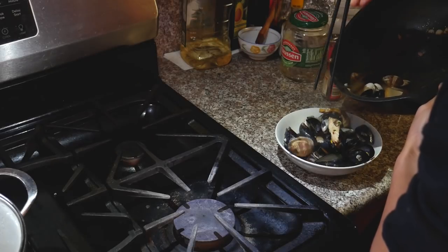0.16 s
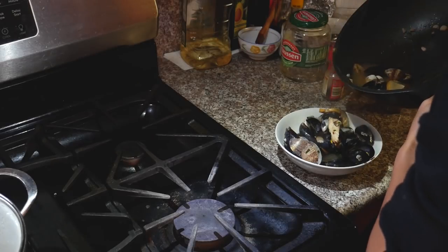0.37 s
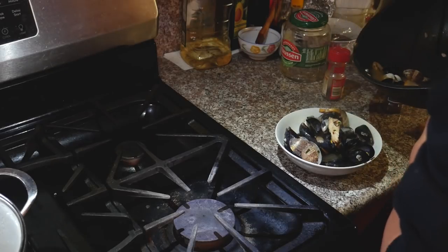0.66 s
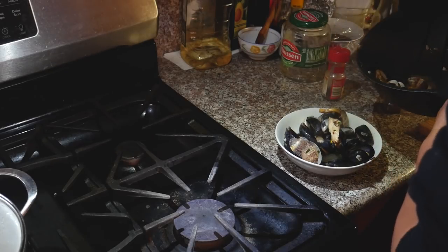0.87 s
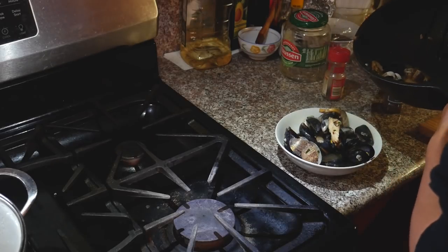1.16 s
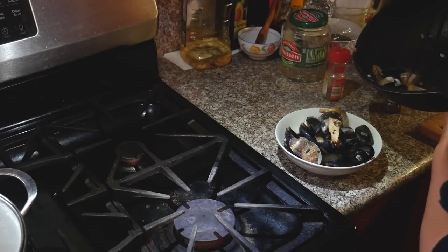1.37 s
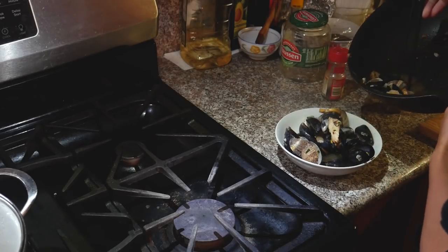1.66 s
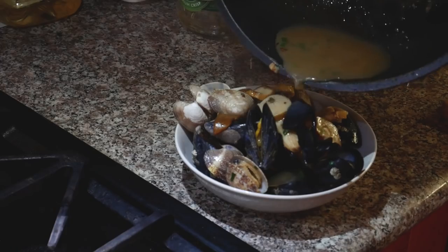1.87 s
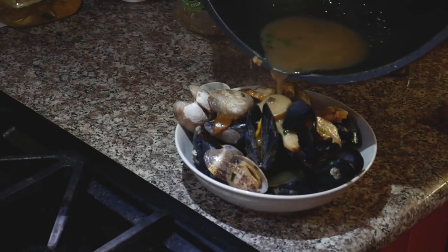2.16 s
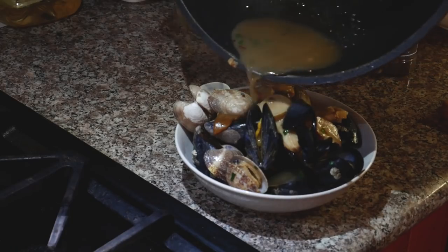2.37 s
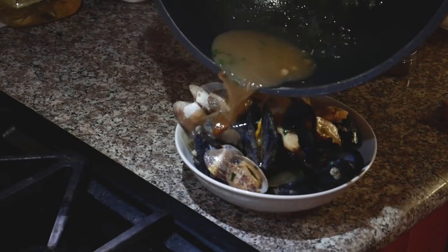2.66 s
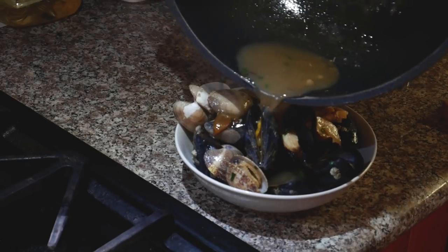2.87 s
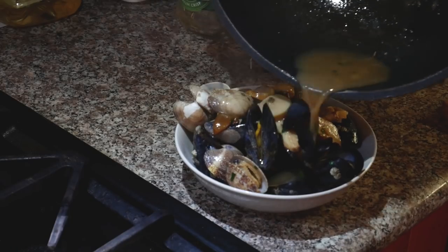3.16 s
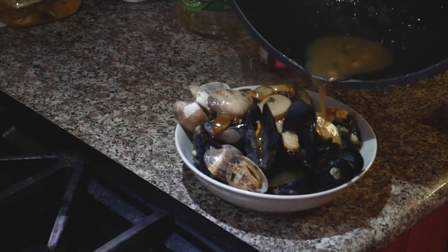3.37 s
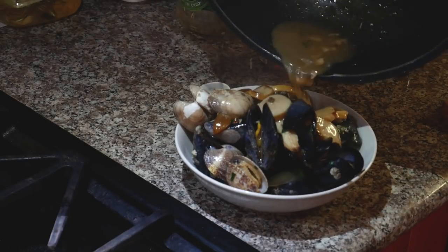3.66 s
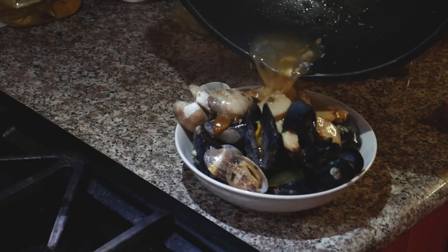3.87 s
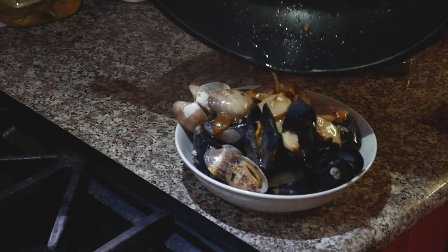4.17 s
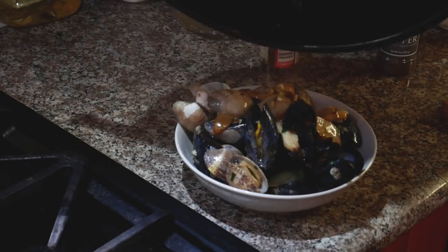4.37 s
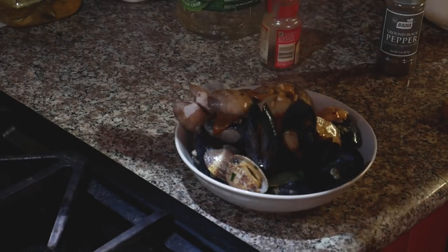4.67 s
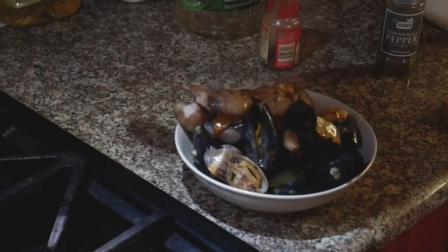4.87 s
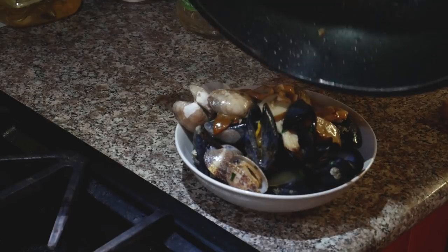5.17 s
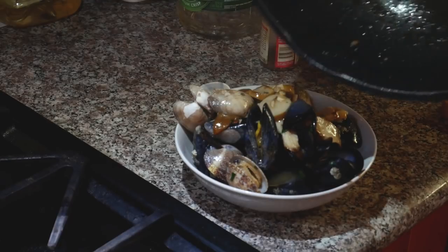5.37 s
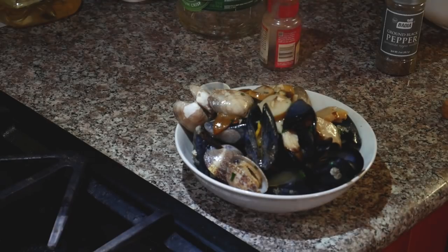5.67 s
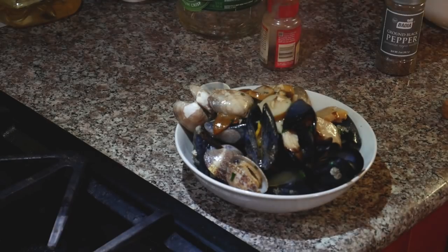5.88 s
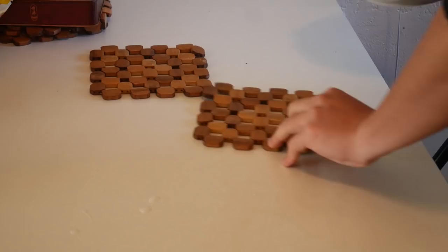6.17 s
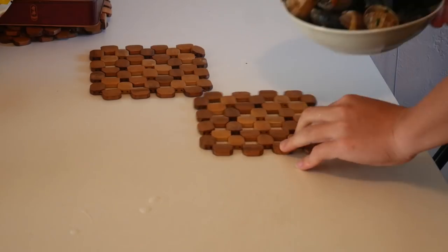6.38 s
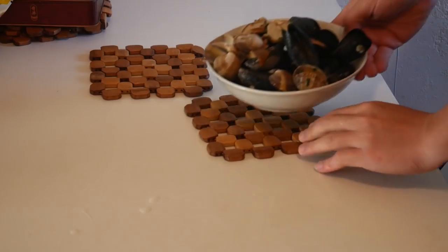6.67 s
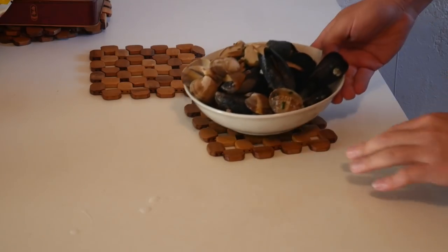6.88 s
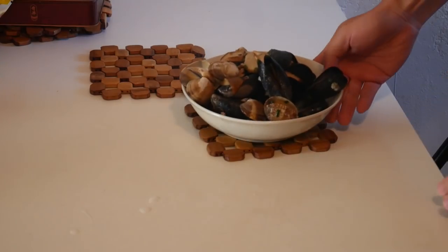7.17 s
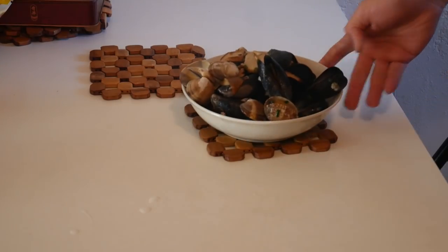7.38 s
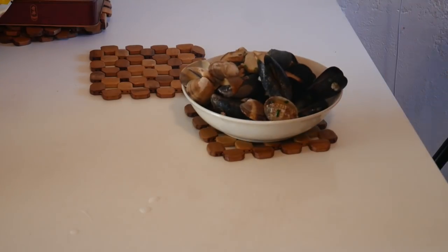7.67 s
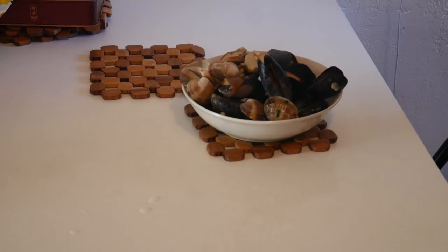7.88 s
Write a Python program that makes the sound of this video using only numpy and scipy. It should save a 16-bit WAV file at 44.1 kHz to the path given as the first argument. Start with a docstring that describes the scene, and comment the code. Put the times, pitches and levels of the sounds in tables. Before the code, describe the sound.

A quick clatter of shells is followed by bright knocks of chopsticks on a steel wok, then their clack and short roll on stone. A thin stream of broth trickles with tiny plips. Next a wooden trivet clacks and scrapes on a table, a heavy bowl lands on it with a thud, and a sleeve swishes faintly. It is all heard from nearby, over the low hum of a kitchen and then a dining room.

```python
"""A humming kitchen, then a dining room. The last clams click from a wok into a bowl. Chopsticks knock
the ringing steel rim, then bounce and roll on the stone counter. Broth trickles over the shells, its
drops trapping tiny ringing bubbles. In the dining room a wooden trivet (a pot stand) slaps down and
slides on the table. The full bowl thumps onto it and rocks once; clothes swish as the arm draws back."""
import sys
import numpy as np
from scipy import signal
from scipy.fft import rfft, irfft, next_fast_len
from scipy.io import wavfile
from scipy.ndimage import map_coordinates

SR = 44100
rng = np.random.default_rng(int(sys.argv[2]) if len(sys.argv) > 2 else 0)


def put_to_file(sound):
    """Save the sound as 16-bit audio at rate SR, in the file named by the first command-line argument."""
    columns = np.atleast_2d(sound).T  # one column per channel
    safe = np.clip(columns, -1, 1)
    whole_steps = np.round(safe * 32767)
    wavfile.write(sys.argv[1], SR, whole_steps.astype(np.int16))


N = 354563

# Levels are relative: each source adds its own gain. A decay_s is the time to fade by 60 dB.
# A "tone" lists how strong low and high sounds are; "modes" are the notes a struck thing rings at.
# Electric hum in each room: mains_multiple, level_db
KITCHEN_MAINS = [(1, -57), (2, -42), (4, -64.5)]
DINING_MAINS = [(2, -51.5), (4, -53.5)]
# The kitchen fan, and distant motors heard in the dining room: pitch_hz, level_db
FAN_HUM = [(153, -60.5), (186.5, -57.5), (202.5, -63.5), (219.5, -61), (235, -60), (322, -62.5), (356, -67),
           (415, -66), (511, -65.5)]
FAR_MOTOR_HUM = [(47, -53), (153.5, -58), (168, -62), (187, -54.5), (205, -64), (237, -62), (356, -59),
                 (441, -60.5), (513, -67), (630, -67)]
# Moving air in each room: pitch_hz, level_db
KITCHEN_AIR_TONE = [(12, -48), (30, -12.5), (60, -3.5), (90, -9.5), (160, -7.5), (235, -9.5), (270, -11),
                    (400, -9), (520, -11), (800, -16.5), (1100, -19), (1500, -25), (4500, -34.5),
                    (9000, -44.5), (16000, -45.5)]
DINING_AIR_TONE = [(20, -6), (45, 4.5), (90, -5), (170, 0), (300, -5), (500, -9.5), (800, -13.5),
                   (1500, -22), (3000, -24.5), (7000, -34.5), (16000, -46.5)]
# How long the echo lasts in both rooms: pitch_hz, decay_s
ROOM_DECAY = [(150, 0.44), (500, 0.39), (1400, 0.52), (4000, 0.41), (9000, 0.29), (16000, 0.25)]

# Rubbing fabric: pitch_hz, level_db
CLOTH_TONE = [(700, 3), (1800, -3), (3500, 0.5), (5500, -3.5), (7500, -11), (12000, -14), (16000, -26)]
# Faint back-and-forth swishing: start_s, period_s, stop_s, level_db
SWISH_RUNS = [(1.968, .358, 4.6, -60), (4.775, 0.2285, 5.55, -58)]
# Single moves of the arm: middle_s, level_db, half_length_s
ARM_MOVES = [(5.86, -58, 0.097), (6.09, -55.5, 0.041), (6.189, -49, 0.05), (7.59, -47.5, 0.1005),
             (7.895, -51, 0.051)]
# Light ticks of rolling chopsticks, and taps of hands, dishes and settling shells:
# start_s, level_db, brightness_db_per_octave
TAPS = [(1.506, -32.5, 6), (1.611, -28, -1.5), (1.764, -39.5, -2.5), (1.786, -27, 2), (1.826, -40.5, 0),
        (5.848, -34.5, -1.5), (7.128, -22, -3), (7.172, -23.5, -2.5)]
# One such tick or tap: pitch_hz, level_db
TAP_TONE = [(400, -26), (850, -2), (1400, -11), (3000, -3.5), (4500, -13), (5800, -8.5), (7000, -21.5),
            (12800, -34.5), (16000, -44)]

# The fattest drops of broth: start_s, level_db, bubble_hz, splash_db
BIG_DROPS = [(2.8138, -26.5, 2800, -18), (2.885, -38.5, 3050, -4), (2.8983, -35, 2430, -2),
             (2.9264, -34, 3450, -22), (2.9746, -41, 2240, -2.5), (3.03, -32.5, 2790, -4),
             (3.1557, -34.5, 4970, -22), (3.693, -35.5, 4000, 1), (3.7298, -24, 2410, -13.5),
             (3.8951, -35, 4900, 1), (4.1116, -40, 2080, 0), (4.1906, -37, 1950, 2),
             (4.2667, -40.5, 2300, -17)]
# Extra flow at each further tip of the wok: middle_s, level_db, half_length_s
GUSHES = [(2.92, -62, .12), (3.36, -62.5, .06), (3.69, -65, .05), (4.06, -58.5, .15)]
# Shells dropping on shells: start_s, level_db, ring_hz, brightness_db_per_octave
SHELL_HITS = [(-0.025, -12.5, 2780, 7), (0.0258, -9, 3720, 0.5), (0.062, -4.5, 2916, 3),
              (0.0651, -7.5, 2650, 1), (0.0773, -18.5, 3330, -3.5), (0.1452, -8.5, 3780, 5),
              (0.1655, -18, 1900, -4.5)]
# A shell's click: pitch_hz, level_db
SHELL_TONE = [(240, -60), (400, -29.5), (616, -35), (655, -38), (777, -20.5), (2050, -9), (2840, 2.5),
              (4240, -5.5), (4800, 0.5), (7870, -23), (12500, -27.5), (16000, -44.5)]

# Chopsticks knocking the wok: start_s, level_db, treble_limit_hz, ring_db
WOK_HITS = [(0.244, -2.5, 14600, -9.5), (0.2752, -9.5, 6000, -12), (0.3275, -11.5, 12600, -10),
            (0.335, -15.5, 14000, -22), (0.403, -19, 5000, -13)]
# The clack on its rim: pitch_hz, level_db
WOK_TONE = [(120, -37), (350, -12), (520, -16), (900, -5.5), (1400, -7.5), (1800, 0), (2400, -7),
            (3500, -1.5), (4100, 2), (4500, -11), (5400, -0.5), (6400, -15.5), (9500, -11), (10400, -27),
            (13000, -13), (16000, -29)]
# Its ringing steel: pitch_hz, level_db, decay_s
WOK_MODES = [(856, -14, .17), (1820, -5, .14), (1997, -6, .33), (2939, -4, .24), (3500, 0, .2),
             (4081, -1, .32), (5464, -4, .26), (7115, -5, .38), (8895, -3, .33), (10905, -12, .22),
             (13080, -7, .11)]

# Each chopstick meeting the counter: start_s, level_db, first_bounce_change_db
STICK_LANDINGS = [(1.2455, -7, -7.5), (1.3216, -9, -20.5)]
# A stick's clack on stone: pitch_hz, level_db
STICK_TONE = [(150, -61), (300, -21), (490, -8.5), (700, -31), (1080, -6.5), (1550, -16), (2020, 2.5),
              (2400, -15), (2850, -2.5), (3400, -7), (3900, -15), (5630, -14.5), (12300, -37.5),
              (16000, -58)]
# The sticks bending to and fro: pitch_hz, level_db, decay_s
STICK_MODES = [(454, -9, 0.14), (547, -11, 0.48), (1106, 0, 0.41), (1292, -5.5, 0.23), (1990, -0.5, 0.3),
               (2143, -6, 0.35), (2810, -8.5, 0.38), (2880, -12, 0.19), (3330, 4.5, 0.17), (5610, -5, 0.15)]
# The notes of the rolling sticks: pitch_hz, width_hz, level_db
ROLL_MODES = [(1077, 32, 12), (1290, 22, -7), (1990, 39, 0.5), (2910, 150, 5), (3250, 56, -3.5),
              (3650, 120, 1.5), (4970, 56, -5)]
# The hiss of their rolling: pitch_hz, level_db
ROLL_TONE = [(240, -32), (400, -3), (545, -5.5), (676, -11.5), (1070, -12.5), (1180, -11.5), (2320, -16.5),
             (2800, -5.5), (10500, -33), (16000, -44.5)]

# The trivet's edges slapping the table: start_s, level_db, brightness_db_per_octave, echo_db
TRIVET_HITS = [(6.226, -2, 0.5, -2.5), (6.2663, -4.5, 4, -4.5), (6.375, -12.5, -5, -3),
               (6.677, -21, -2, -2.5)]
# Its slap and its scrape: pitch_hz, level_db
SLAP_TONE = [(180, -48), (300, -23.5), (900, -13.5), (978, -2.5), (1480, -11.5), (1690, -2.5), (2250, -6.5),
             (3290, 0), (4990, -10), (5430, -9), (8360, -25), (9880, -25), (13800, -35.5), (16000, -58)]
SCRAPE_TONE = [(240, -43), (400, -14), (636, -7), (697, -15), (994, -4), (1490, -8), (1650, -7.5),
               (2840, -6.5), (12300, -38), (16000, -46)]
# Its ringing wooden blocks: pitch_hz, level_db, decay_s
BLOCK_MODES = [(980, -2, .12), (1280, -5, .15), (1690, -4, .12), (1973, 2, .15), (2780, -1, .12),
               (3165, 0, .12), (3490, -2, .12), (4360, -7, .1), (5362, -6, .1)]
# Pushes that slide it: start_s, stop_s, level_db
SLIDES = [(6.307, 6.492, -38.5), (6.681, 6.679, -40)]

# The bowl meeting the trivet: start_s, level_db, brightness_db_per_octave, ring_db
BOWL_HITS = [(6.976, 1, 1, -4.5), (6.980, -8.5, 1.5, -2), (6.987, -10.5, -0.5, -20), (7.187, -10, -0.5, -8),
             (7.191, -15, 2.5, -12)]
# Its thud: pitch_hz, level_db
THUD_TONE = [(41, -55), (70, -28), (86, -19), (129, -5.5), (199, -8.5), (233, -6), (441, 0), (472, -3),
             (529, -4.5), (1100, -12), (1310, -14.5), (3910, -27), (9700, -43), (14000, -53), (16000, -89)]
# The table top with the bowl on it: pitch_hz, level_db, decay_s
TABLE_MODES = [(145, -10, 0.44), (199, -2.5, 0.33), (319, -6, 0.25), (431, -0.5, 0.114), (472, -2, 0.15),
               (507, 0.5, 0.17), (790, -14, 0.6), (884, -8, 0.43), (1016, -12.5, 0.41), (1279, 0, 0.12),
               (1340, -9, 0.19), (1720, -19, 0.25)]
# The bowl's foot rocking down: start_s, level_db
FOOT_TOUCHES = [(7.138, -25.5), (7.197, -20)]
# The low notes that the rocking wakes: pitch_hz, level_db, decay_s
ROCK_MODES = [(148, -6.5, 0.16), (199, -12.5, 0.23), (249.4, 0, 0.23), (290.6, -5.5, 0.2),
              (389, -6.5, 0.21), (546, -5.5, 0.064)]

MAINS_HZ, TOP_HZ = 60.03, 15900  # the electric supply; the upper limit of the sound
TIME_S = np.arange(N) / SR
HIT_S = np.arange(2 ** 15) / SR  # time since a hit
HIT_HZ = np.fft.rfftfreq(len(HIT_S), 1 / SR)  # the frequencies in a hit


def amp(db):
    """Turn decibels into a gain to multiply by."""
    return 10 ** (np.asarray(db) / 20)


def unit_level(x):
    """Scale a long sound to an average (rms) level of 1."""
    return x / np.sqrt(np.mean(x ** 2) + 1e-20)


def unit_energy(x):
    """Scale a short sound to a total energy of 1."""
    return x / (np.linalg.norm(x) + 1e-12)


def look_up(points, hz):
    """Read between (pitch_hz, value) rows, with octaves evenly spaced."""
    pitches, values = np.transpose(points)
    return np.interp(np.log(hz + 1), np.log(pitches + 1), values)


def wobble(per_s):
    """A smooth random curve through per_s points a second."""
    points = rng.standard_normal(int(N * per_s / SR) + 4)
    return map_coordinates(points, [TIME_S * per_s])


def filtered(x, gain_at):
    """Scale each frequency in x by gain_at(hz)."""
    size = next_fast_len(N + SR // 2)
    return irfft(rfft(x, size) * gain_at(np.fft.rfftfreq(size, 1 / SR)), size)[:N]


def with_tone(x, tone):
    """Give x a tone, at an average level of 1."""
    return unit_level(filtered(x, lambda hz: amp(look_up(tone, hz))))


def noise(tone):
    """A steady rush with the given tone."""
    return with_tone(rng.standard_normal(N), tone)


def fade(decay_s, t=HIT_S):
    """A gain that falls 60 dB in decay_s; 1 - fade is a soft start."""
    return np.exp(-np.log(1000) * t / decay_s)


def held(start_s, stop_s, rise_db_per_s, fall_db_per_s):
    """A gain that rises to 1 by the start, holds, and dies away after the stop."""
    early_s, late_s = np.maximum(start_s - TIME_S, 0), np.maximum(TIME_S - stop_s, 0)
    return amp(-rise_db_per_s * early_s - fall_db_per_s * late_s)


def swells(rows):
    """A gain with one bell-shaped swell for each row."""
    return sum(amp(db) * np.exp(-((TIME_S - s) / half_s) ** 2) for s, db, half_s in rows)


def add(track, start_s, sound):
    """Mix a sound into the track, dropping what falls outside it."""
    start = round(start_s * SR)
    rest = sound[max(-start, 0):]
    part = track[max(start, 0):][:len(rest)]
    part += rest[:len(part)]


def clack(tone, bright, chatter_s, rise_s, limit_hz=30000):
    """Two things chatter briefly as they meet; a harder hit is brighter and reaches higher."""
    softness = 1 / (1 + (HIT_HZ / limit_hz) ** 8)
    gain = softness * amp(look_up(tone, HIT_HZ) + bright * np.log2(np.maximum(HIT_HZ, 200)))
    # Build the filter so that nothing sounds before the hit.
    first_half = np.arange(len(HIT_S)) < len(HIT_S) // 2
    body = np.exp(rfft(irfft(np.log(gain)) * 2 * first_half))
    force = rng.standard_normal(len(HIT_S)) * fade(chatter_s) * (1 - fade(rise_s))
    return unit_energy(irfft(rfft(force) * body))


def ring(modes):
    """A struck thing's fading notes, mixed a little differently each time."""
    chance = rng.standard_normal((len(modes), 2))
    notes = (np.sign(side) * amp(db + extra_db) * np.sin(2 * np.pi * hz * HIT_S) * fade(decay_s)
             for (hz, db, decay_s), (extra_db, side) in zip(modes, chance))
    return unit_energy(sum(notes))


def crackle(per_s, spread_db):
    """Tiny bumps of random size at random times."""
    happens = rng.random(N) < per_s / SR
    return unit_level(happens * rng.standard_normal(N) * amp(spread_db * rng.standard_normal(N)))


def in_room(sound, echo_db):
    """Add the room's echo, a wash that builds up quickly and dies away."""
    hz, t, bands = signal.stft(rng.standard_normal(len(HIT_S)), SR, nperseg=256)
    bands *= fade(look_up(ROOM_DECAY, hz)[:, None], t)
    tail = signal.istft(bands, SR, nperseg=256)[1][:len(HIT_S)]
    echo = signal.fftconvolve(sound, tail * (1 - fade(0.012)))[:len(HIT_S)]
    return sound + amp(echo_db) * np.linalg.norm(sound) * unit_energy(echo)


def hum(notes, waver_db, drift_rad):
    """Motor notes, each a little unsteady in strength and timing."""
    out = np.zeros(N)
    for hz, db in notes:
        strength = np.sqrt(2) * amp(db + waver_db * wobble(2.2))
        out += strength * np.sin(2 * np.pi * (hz * TIME_S + rng.random()) + drift_rad * wobble(1.92))
    return out


def mains_hum(rows):
    """Steady hum at whole multiples of the electric supply's frequency."""
    return hum([(round(multiple) * MAINS_HZ, db) for multiple, db in rows], 0.1, drift_rad=0.019)


def beating_motors(gap_hz=0.6, lull_s=7.57, second_motor_db=-2.5):
    """Two motors at nearly the same speed take turns boosting and cancelling each other."""
    beat = np.abs(1 - amp(second_motor_db) * np.exp(2j * np.pi * gap_hz * (TIME_S - lull_s)))
    return beat * mains_hum([(1, -48.5)])


def rooms(change_s=6.215):
    """Each room has its own hum and moving air; a low rumble swells between them."""
    kitchen = mains_hum(KITCHEN_MAINS) + hum(FAN_HUM, waver_db=3.5, drift_rad=0.405)
    kitchen += amp(-49.5) * noise(KITCHEN_AIR_TONE)
    dining = mains_hum(DINING_MAINS) + beating_motors()
    dining += hum(FAR_MOTOR_HUM, waver_db=1.3, drift_rad=0.36) + amp(-46.5) * noise(DINING_AIR_TONE)
    blend = np.clip((TIME_S - change_s) / 0.016, 0, 1)
    rumble = noise([(4, -10), (11, 2.5), (24, -6), (40, -20), (60, -15.5), (200, -68), (1000, -120)])
    rumble *= amp(-40.5) * held(5.58, 6.22, rise_db_per_s=220, fall_db_per_s=140)
    return (1 - blend) * kitchen + blend * dining + rumble


def clothes(half_stroke_s=0.029):
    """Fabric swishes softly, in even runs of strokes and with each move of the arm."""
    strokes = [(s, db, half_stroke_s) for start, period, stop, db in SWISH_RUNS
               for s in np.arange(start, stop, period)]
    return noise(CLOTH_TONE) * swells(strokes + list(ARM_MOVES))


def taps():
    """Rolling chopsticks tick lightly; hands, dishes and settling shells make small taps."""
    out = np.zeros(N)
    for s, db, bright in TAPS:
        tap = clack(TAP_TONE, bright, chatter_s=0.042, rise_s=0.003)
        add(out, s, amp(db + 15) * in_room(tap, echo_db=-9))
    return out


def bubble(hz, cycles):
    """Trapped air rings: small bubbles die sooner, and the pitch rises toward the surface."""
    t = HIT_S[:SR // 25]
    life_s = cycles / hz
    pitch_hz = hz * (0.924 + 0.15 * (1 - fade(2 * life_s, t)))
    loudness = fade(life_s, t) * (1 - fade(life_s / 4, t))
    return unit_energy(loudness * np.sin(2 * np.pi * np.cumsum(pitch_hz) / SR))


def bubble_cluster(hz, scatter, cycles, span_s, count):
    """Bubbles around one pitch, born close together; later ones tend to be quieter."""
    out = np.zeros(len(HIT_S))
    for k, (pitch, size, when) in enumerate(rng.standard_normal((count, 3))):
        s = span_s * abs(when) * (k > 0)
        bubble_hz = min(hz * np.exp(scatter * pitch), TOP_HZ)
        add(out, s, amp(4.3 * size - 6 * s / span_s) * bubble(bubble_hz, cycles))
    return unit_energy(out)


def drop(hz, splash_db, splat_db):
    """A drop splats, traps a few bubbles and throws a fine spray."""
    plip = bubble_cluster(hz, scatter=0.097, cycles=34, span_s=0.0037, count=6)
    splat_tone = [(hz / 3, -25), (hz, 0), (2 * hz, -13), (TOP_HZ + 5000, -28)]
    splat = clack(splat_tone, bright=0, chatter_s=0.038, rise_s=0.0042)
    splash = bubble_cluster(7500, scatter=0.46, cycles=31, span_s=0.01, count=10)
    return amp(11) * in_room(plip + amp(splat_db) * splat + amp(splash_db - 4) * splash, echo_db=-6.5)


def small_drops(flow, count=28, crowding=0.7):
    """Small drops are nearly all bubble, and crowd together where the broth runs fast."""
    fallen = np.cumsum(flow ** crowding)
    shares = (np.arange(count) + rng.random(count)) / count
    times_s = np.searchsorted(fallen / fallen[-1], shares) / SR
    out = np.zeros(N)
    for s, (size, pitch) in zip(times_s, np.clip(rng.standard_normal((count, 2)), -2, 2)):
        add(out, s, amp(-44.5 + 3 * size) * drop(3890 * 2 ** (0.5 * pitch), splash_db=-6.5, splat_db=-14))
    return out


def broth():
    """A thin stream drips and fizzes between the shells; more flow makes a louder fizz."""
    flow = amp(-73) * held(2.05, 4.85, rise_db_per_s=151, fall_db_per_s=150) + swells(GUSHES)
    drops = np.zeros(N)
    for s, db, hz, splash_db in BIG_DROPS:
        add(drops, s, amp(db) * drop(hz, splash_db, splat_db=-4.5))
    drops += small_drops(flow)
    fizz = np.zeros(N)
    for when, pitch, size in rng.random((5000, 3)):
        add(fizz, when * N / SR, amp(12 * size ** 2) * bubble(2200 * 6 ** pitch, cycles=32))
    return drops + amp(-5.5) * flow * with_tone(fizz, [(2000, 0), (6000, 0), (15000, -6)])


def shells():
    """Hard, thin shells click and ring very briefly."""
    out = np.zeros(N)
    for s, db, hz, bright in SHELL_HITS:
        click = clack(SHELL_TONE, bright, chatter_s=0.021, rise_s=0.002)
        ping = ring([(hz, 0, 0.025), (1.9 * hz, -5, 0.016)])
        add(out, s, amp(db + 15) * in_room(click + amp(-3) * ping, echo_db=-8))
    return out


def wok():
    """Each knock on the rim clacks and sets the steel ringing; soft knocks miss the high notes."""
    out = np.zeros(N)
    for s, db, limit_hz, ring_db in WOK_HITS:
        steel = ring([mode for mode in WOK_MODES if mode[0] < 1.2 * limit_hz])
        knock = clack(WOK_TONE, bright=0, chatter_s=0.056, rise_s=0.0019, limit_hz=limit_hz)
        add(out, s, amp(db + 16) * (in_room(knock, echo_db=-7.5) + amp(ring_db - 2.5) * steel))
    return out


def stick_knock(bright, ring_db):
    """A chopstick hits stone: a clack, a ring cut short by the stone, and a free ring."""
    damped = ring([(hz, db, 0.21 * decay_s) for hz, db, decay_s in STICK_MODES]) * (1 - fade(0.003))
    knock = clack(STICK_TONE, bright, chatter_s=0.058, rise_s=0.0045)
    return amp(15) * in_room(knock + amp(-0.5) * damped + amp(ring_db) * ring(STICK_MODES), echo_db=-6)


def stick_roll():
    """Rolling on stone, the sticks meet tiny bumps that make them ring and hiss."""
    def stick_gain(hz):
        return sum((-1) ** k * amp(db) * 1j * hz * width / (pitch ** 2 - hz ** 2 + 1j * hz * width)
                   for k, (pitch, width, db) in enumerate(ROLL_MODES))
    bumps = crackle(per_s=3500, spread_db=0)
    roll = amp(-7) * unit_level(filtered(bumps, stick_gain)) + amp(-5.5) * with_tone(bumps, ROLL_TONE)
    return amp(-39.5) * held(1.425, 1.63, rise_db_per_s=170, fall_db_per_s=160.5) * roll


def chopsticks(first_hop_s=0.035, hop_shrink=0.3, loss_db=1.5):
    """The sticks land, bounce twice ever faster, ringing more freely in the air, and roll to rest."""
    out = np.zeros(N)
    delays_s = np.cumsum(first_hop_s * hop_shrink ** np.arange(2))
    for s, db, bounce_db in STICK_LANDINGS:
        add(out, s, amp(db) * stick_knock(bright=-0.91, ring_db=-14.5))
        for k, delay_s in enumerate(delays_s):
            add(out, s + delay_s, amp(db + bounce_db - k * loss_db) * stick_knock(bright=2.5, ring_db=1))
    return out + stick_roll()


def trivet():
    """Linked wooden blocks slap down edge by edge, then scrape over the table when pushed."""
    out = np.zeros(N)
    for s, db, bright, echo_db in TRIVET_HITS:
        for delay_s, touch_db in [(-0.006, -10.5), (0, 0), (0.019, -10)]:  # corner, slap, rebound
            slap = clack(SLAP_TONE, bright, chatter_s=0.033, rise_s=0.002)
            wood = in_room(slap, echo_db) + amp(-6.5) * ring(BLOCK_MODES)
            add(out, s + delay_s, amp(db + touch_db + 12) * wood)
    scrape = with_tone(crackle(per_s=3200, spread_db=-1), SCRAPE_TONE)
    pushes = sum(amp(db) * held(start, stop, rise_db_per_s=4996, fall_db_per_s=196)
                 for start, stop, db in SLIDES)
    return out + pushes * scrape


def bowl():
    """The heavy bowl thumps and the table rings; its foot rocks down softly, waking only low notes."""
    out = np.zeros(N)
    for s, db, bright, ring_db in BOWL_HITS:
        thud = clack(THUD_TONE, bright, chatter_s=0.0026, rise_s=0.00032)
        rattle = clack(THUD_TONE, bright, chatter_s=0.0474, rise_s=0.0028)
        thump = thud + amp(-7.5) * rattle + amp(ring_db) * ring(TABLE_MODES)
        add(out, s, amp(db + 14.5) * in_room(thump, echo_db=-3.5))
    for s, db in FOOT_TOUCHES:
        soft_bump = ring(ROCK_MODES) * (1 - fade(0.015))
        add(out, s, amp(db + 31) * in_room(soft_bump, echo_db=-12.5))
    return out


def scene():
    """Add up all the sources, the same on the left and the right."""
    mono = shells() + wok() + chopsticks() + taps() + broth() + trivet() + bowl() + clothes() + rooms()
    return np.array([mono, mono])


def record(dry):
    """Flatten peaks beyond full scale, then remove everything above TOP_HZ."""
    return np.array([filtered(np.clip(channel, -1, 1), lambda hz: hz < TOP_HZ) for channel in dry])


dry = scene()
out = record(dry)
put_to_file(out)
```